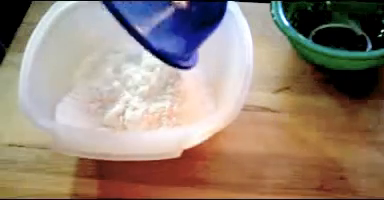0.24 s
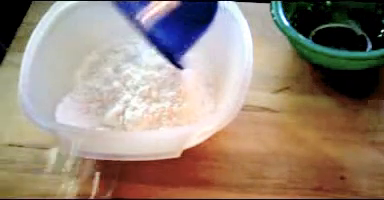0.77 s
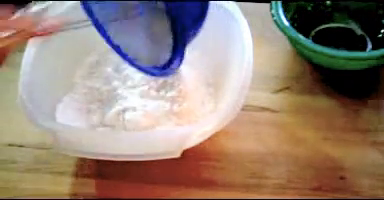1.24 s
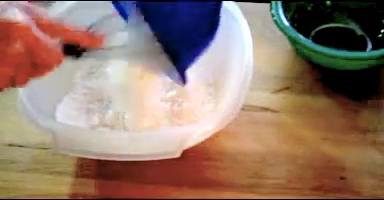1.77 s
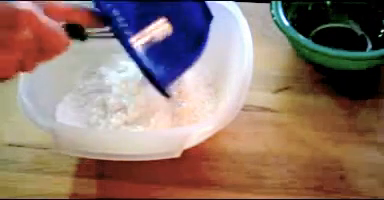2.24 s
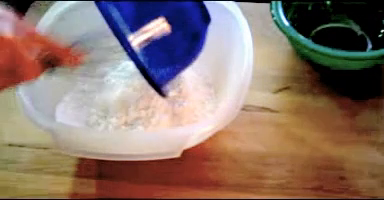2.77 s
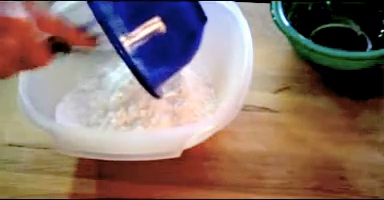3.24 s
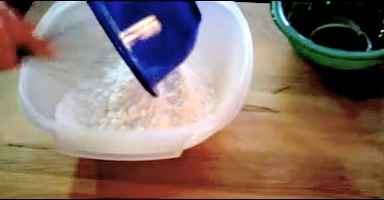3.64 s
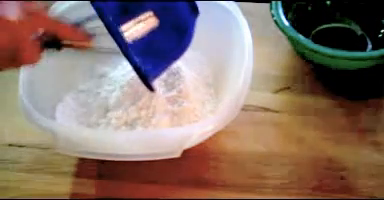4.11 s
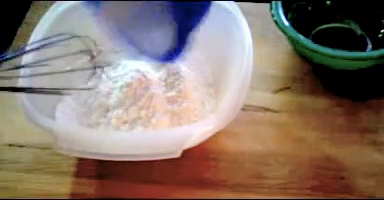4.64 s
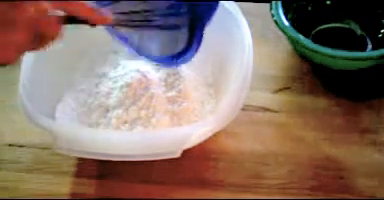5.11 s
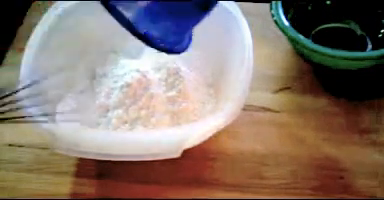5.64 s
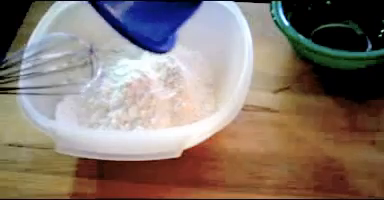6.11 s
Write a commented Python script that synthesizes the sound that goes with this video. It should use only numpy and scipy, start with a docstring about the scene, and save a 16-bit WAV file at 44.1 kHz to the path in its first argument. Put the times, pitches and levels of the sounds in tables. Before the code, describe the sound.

A dull low ring dies away in the first second over quiet kitchen rumble, microphone hiss and a thin, steady high whine. At about 1.3 seconds a wire whisk gives a bright, rattling clink close by. From 1.5 to 2.3 seconds plastic bowls bump softly while a faint hum swells and fades. From about 1.8 seconds the whisk is shaken roughly three times a second, scraping flour from a small plastic bowl into a large one. The strokes are faint at first, then become clearer ringing clinks against the rim between 3.3 and 4 seconds, stopping with soft bumps at 4.2. After a pause, another soft bump and a small scraping clink come at around 5.2 to 5.4 seconds. At 5.7 seconds one firm, hollow knock on the small bowl is the loudest sound. The room adds only a slight, short echo.

```python
"""A dull low ring dies away over quiet kitchen rumble, microphone hiss and a camera's thin whine.
Close by, a wire whisk scrapes flour from a small plastic bowl into a large one. The plastic gives soft
bumps while a faint hum swells and fades. The whisk is shaken about three times a second, and its wire
loops clink, scrape and ring as they meet the rim. Near the end comes one firm knock on the small bowl."""
import sys
import numpy as np
from scipy import signal
from scipy.fft import rfft, irfft
from scipy.io import wavfile
from scipy.ndimage import uniform_filter1d

SR = 44100
rng = np.random.default_rng(int(sys.argv[2]) if len(sys.argv) > 2 else 0)


def materialize(psi):
    """Save the field psi as 16-bit PCM at rate SR to the path in sys.argv[1].

    A 1-D psi becomes a single channel; in a 2-D psi each row is a channel.
    """
    bounded = np.clip(np.atleast_2d(psi).T, -1, 1)
    quanta = np.round(bounded * 32767).astype(np.int16)
    wavfile.write(sys.argv[1], SR, quanta)


N = 281358
TIME = np.arange(N) / SR
AGE = np.arange(int(.35 * SR)) / SR  # seconds since a hit began

# room rumble running into microphone hiss: (frequency [Hz], level [dB per Hz])
RUMBLE_AND_HISS = [(18, -66.5), (45, -74.5), (100, -82.5), (230, -89.5), (500, -93), (1000, -99),
                   (3500, -105.5), (5400, -107.7), (6100, -105), (6900, -109.7), (8200, -105),
                   (11200, -105.5), (13300, -109.5), (15300, -110)]
# the opening low ring; a fade time, or t60, is how long a sound takes to drop by 60 dB:
# (pitch [Hz], width [Hz], starting level [dB], fade time [s])
LOW_RING_BANDS = [(327, 24, -63.5, 1.8), (388, 59, -57, 0.54), (491, 29, -60.5, .4)]
# the tones each bowl rings with: (pitch [Hz], relative level [dB], fade time [s])
LARGE_BOWL_TONES = [(278, 2, 0.08), (406, 4, 0.026), (638, -4.5, 0.16), (745, 0, 0.14), (961, -0.5, 0.12),
                    (1106, 5, 0.03), (1288, -8.5, 0.082)]
SMALL_BOWL_TONES = [(122, -10, .12), (195, -12, .09), (320, -12, .06), (372, -3.5, .1), (430, -7, .08),
                    (738, -19, .08), (955, -8, .07), (1048, 0, .09), (1125, -4, .05), (1324, -14, .09),
                    (1548, -14, .1), (1775, -14, .1), (1901, -6, .09), (2028, 0, .085), (2265, -7, .08),
                    (2390, -4, .045), (2600, -7, .025), (3430, -18, .05), (4040, -14, .04),
                    (4420, -13, .04), (5100, -17, .04)]
# soft bumps of plastic on plastic: (time [s], ring level [dB], scuff level [dB])
SOFT_BUMPS = [(0.225, -58.5, -79), (1.469, -60, -58.5), (1.711, -62, -68), (1.951, -50.5, -56.5),
              (2.304, -45.5, -54.5), (4.1445, -55.5, -72), (4.19, -57, -62), (5.186, -51.5, -62.5)]
# a firm knock and its rebound: (time [s], ring level [dB], crack level [dB], clatter level [dB])
KNOCK_HITS = [(5.7245, -29.5, -46, -47), (5.7336, -51, -51, -55)]
# the tones of the wire loops: (pitch [Hz], relative level [dB], fade time [s])
WIRE_TONES = [(1088, 0, .17), (1850, -19, .08), (2690, -6, .05), (2772, -1, .22), (2860, -11, .07),
              (3380, -16, .08), (3750, -17, .045), (4660, -14, .08), (5080, -1, .135), (5243, -7, .08),
              (5600, -16, .07), (7450, -9, .06), (7700, -2, .14), (8255, -8, .08), (8905, -11, .09),
              (9180, -9, .1), (9440, -10, .1), (9880, -10, .07), (10340, -9, .06), (10680, -5, .14),
              (11130, -12, .07), (12790, -6, .08), (13730, -13, .05), (14970, -12, .045)]
# the pitches at which the next table boosts or cuts the wire tones: (pitch [Hz])
SPOT_PITCHES = (1080, 2770, 3750, 5100, 7700, 10600, 12800)
# where a loop is touched decides which tones ring:
# spot name -> (boost at each of the seven SPOT_PITCHES [dB], relative rasp level [dB])
TOUCH_SPOTS = {"tip": (-1.5, 1, -4.5, 1, -0.5, -1.5, 3, -5),
               "flank": (-17.5, -9, 4, -.5, -17, -6, -16, -10),
               "shoulder": (-13, 2, -9, -18, -4, -15, -15, -10), "edge": (-17, -20, -4, -3, -10, 2, 0, -7)}
# single clinks, rattles and slides of the wires: (time [s], level [dB], scrape time [ms], spot [name])
SINGLE_CLINKS = [(0.681, -62.5, 14, "tip"), (1.3263, -34.5, 1.3, "tip"), (1.3311, -40.5, 1.1, "tip"),
                 (1.339, -42, 0.73, "edge"), (1.3634, -51.5, 1, "tip"), (3.923, -42, 0.49, "flank"),
                 (5.3128, -50.5, 4.2, "shoulder"), (5.383, -71, 9, "edge"), (5.428, -67, 3.7, "edge")]
# shaking strokes that meet the rim: (time [s], level [dB], spot [name])
WHISK_STROKES = [(1.791, -69, "edge"), (2.090, -61.5, "flank"), (2.372, -65, "edge"), (2.705, -60, "flank"),
                 (3.02, -70.5, "tip"), (3.3053, -52, "flank"), (3.6054, -41, "flank"),
                 (3.9104, -44, "flank"), (4.1945, -50, "edge")]

FIRM_DB = -42  # level of a firm stroke; other touches are gentler or harder than this


def undb(db):
    """Turn decibels into a number to multiply a sound by."""
    return 10 ** (np.asarray(db) / 20)


def fade(t, t60):
    """A smooth dying away, 60 dB down when t reaches t60."""
    return np.exp(-np.log(1000) * t / t60)


def add(track, start_s, x):
    """Mix x into the track at the given time."""
    i = int(start_s * SR)
    track[i:i + len(x)] += x[:N - i]


def level(x, db):
    """Scale a hit so that its loudest hundredth of a second has the given level."""
    power = uniform_filter1d(x ** 2, SR // 100, mode="constant")
    return x * undb(db) / np.sqrt(power.max())


def band(x, lo_hz, hi_hz):
    """Keep the sound between two frequencies, with gentle edges."""
    return signal.sosfilt(signal.butter(2, [lo_hz, hi_hz], "band", fs=SR, output="sos"), x)


def shaped_noise(spectrum):
    """Noise whose strength from bass to treble follows a table."""
    hz, db = np.transpose(spectrum)
    all_hz = np.maximum(np.fft.rfftfreq(N, 1 / SR), 1)
    gain = undb(np.interp(np.log(all_hz), np.log(hz), db))
    return irfft(rfft(rng.standard_normal(N)) * gain, N) * np.sqrt(SR / 2)


def drift(per_second):
    """A smooth random wander, mostly between -1 and 1."""
    step = int(SR / per_second)
    return uniform_filter1d(np.repeat(rng.standard_normal(N // step + 1), step), step)[:N]


def tone(hz, db):
    """A pure tone whose pitch and level can move."""
    return np.sqrt(2) * np.sin(2 * np.pi * np.cumsum(hz) / SR) * undb(db)


def echoes(x, db, t60, lo_hz, hi_hz, gap_s=None):
    """Many tiny reflections that blur into one fading tail."""
    tail = band(rng.standard_normal(len(AGE)), lo_hz, hi_hz) * fade(AGE, t60)
    if gap_s:
        tail *= AGE > gap_s
    return undb(db) * signal.fftconvolve(x, tail / np.linalg.norm(tail))[:N]


def kitchen(x, echo_db, t60):
    """The sound plus its weak, short echo from the worktop and walls."""
    return x + echoes(x, echo_db, t60, lo_hz=170, hi_hz=6400, gap_s=.006)


def stereo(x, lag_samples):
    """Two microphone openings side by side: sound reaches the left one a hair later."""
    delay = np.exp(-2j * np.pi * np.fft.rfftfreq(N) * lag_samples)
    return np.array([irfft(rfft(x) * delay, N), x])


def channel_noise():
    """A little extra rumble and hiss, different in each channel."""
    shaped = np.array([shaped_noise(RUMBLE_AND_HISS) for _ in range(2)])
    return undb(-19) * shaped + undb(-68.5) * rng.standard_normal((2, N))


def background():
    """Rumble and hiss, a hum that swells once, the camera's whine and a low ring that dies away."""
    rumble_and_hiss = shaped_noise(RUMBLE_AND_HISS) * undb(.16 * drift(4.1))
    peak_s, rise_db_per_s, fall_db_per_s = 2.27, 7, 12.5
    below_peak_db = np.maximum(rise_db_per_s * (peak_s - TIME), fall_db_per_s * (TIME - peak_s))
    hum = tone(hz=177.6 + 1.31 * drift(6.85), db=-64.5 - below_peak_db)
    whine = tone(hz=7865 + 2 * drift(30), db=-67 + .5 * drift(9.8))
    low_ring = np.zeros(N)
    for hz, width, db, t60 in LOW_RING_BANDS:
        noise = band(rng.standard_normal(N), hz - width / 2, hz + width / 2)
        low_ring += noise / noise.std() * undb(db) * fade(TIME, t60)
    return rumble_and_hiss + hum + whine + low_ring


def crackle(t60, lo_hz, hi_hz, uneven_db=2.5):
    """A short burst of tiny contacts of uneven size."""
    noise, size = rng.standard_normal((2, len(AGE)))
    return band(noise * undb(uneven_db * size), lo_hz, hi_hz) * fade(AGE, t60)


def bowl_ring(tones, grip, grip_t60):
    """Struck plastic rings; the hand and the flour soak up most of the swing at once."""
    ring = np.zeros(len(AGE))
    for hz, db, t60 in tones:
        wave = np.sin(2 * np.pi * (hz * AGE + rng.random()))
        onset = 1 - np.exp(-2 * hz * AGE)
        ring += undb(db) * wave * onset * fade(AGE, t60)
    return ring * (1 + grip * fade(AGE, grip_t60))  # grip: the extra early swing that is soon lost


def bumps():
    """Soft blows ring only the low tones of the large bowl and scuff its floury wall."""
    out = np.zeros(N)
    for start_s, ring_db, scuff_db in SOFT_BUMPS:
        ring = level(bowl_ring(LARGE_BOWL_TONES, grip=2.6, grip_t60=.016), ring_db)
        scuff = level(crackle(t60=.091, lo_hz=2980, hi_hz=11000), scuff_db)
        thin_ring = level(crackle(t60=.16, lo_hz=5800, hi_hz=6100), ring_db - 21)
        add(out, start_s, ring + scuff + thin_ring)
    return out


def knock():
    """A hard blow on the emptied small bowl: a hollow ring, a crack and a clatter of the thin wall."""
    out = np.zeros(N)
    for start_s, ring_db, crack_db, clatter_db in KNOCK_HITS:
        ring = level(bowl_ring(SMALL_BOWL_TONES, grip=1.7, grip_t60=.085), ring_db)
        crack = level(crackle(t60=.041, lo_hz=2200, hi_hz=8400), crack_db)
        clatter = level(crackle(t60=.059, lo_hz=900, hi_hz=2560), clatter_db)
        add(out, start_s, ring + crack + clatter)
    return out


def wire_ring(hz, t60, loops=12):
    """One tone in all the loops: slightly out of tune, they start in step, soon cancel, then throb."""
    spread_hz = 27 + .0032 * hz
    detune = np.linspace(-1, 1, loops) + .187 * rng.standard_normal(loops)
    strength = np.exp(-1.5 * detune ** 2)
    phase = 2 * np.pi * (np.outer(hz + spread_hz * detune, AGE) + rng.random())
    first_swing = 1 + fade(AGE, t60=.13)  # the rim soon damps it
    return strength @ np.sin(phase) * fade(AGE, t60) * first_swing


def touch(db, scrape_ms, spot):
    """A wire slides on the rim: it rasps, the plastic thuds, the loops ring and a free one sings on."""
    *boosts_db, rasp_db = TOUCH_SPOTS[spot]
    harder_db = db - FIRM_DB
    swell = 1 - np.exp(-(AGE * 1000 / scrape_ms) ** 2)  # the sound builds while the wire slides
    damping = fade(AGE, t60=1.7 / scrape_ms)  # a wire that stays on the rim dies away sooner
    rasp = level(crackle(t60=.062, lo_hz=2480, hi_hz=12200) * swell, db + rasp_db)
    thud = level(crackle(t60=.12, lo_hz=332, hi_hz=1950) * swell, -56.5 + .37 * harder_db)
    free_loop_hz = 2772
    free_loop = np.sin(2 * np.pi * free_loop_hz * AGE) * fade(AGE, t60=.24)
    out = rasp + thud + level(free_loop * swell * damping, -61.5 + .4 * harder_db)
    for hz, tone_db, t60 in WIRE_TONES:
        ring = wire_ring(hz, t60) * swell * damping
        spot_db = np.interp(hz, SPOT_PITCHES, boosts_db)
        dull_db = .31 * scrape_ms * np.log2(hz / 3000)  # a longer slide favours the low tones
        out += level(ring, db + tone_db + spot_db - dull_db)
    return out


def whisk():
    """Shaking strokes tap the rim, the later ones brushing it on the way back; single clinks join in."""
    out = np.zeros(N)
    wide_from_s = 2.3  # earlier strokes are too narrow to touch on the way back
    for start_s, db, spot in WHISK_STROKES:
        gentler_db = FIRM_DB - db  # gentler strokes slide for longer and swing back later
        add(out, start_s, touch(db, scrape_ms=.66 * 2 ** (gentler_db / 9), spot=spot))
        if start_s > wide_from_s:
            back_s = start_s + .077 + .0008 * gentler_db
            add(out, back_s, touch(db=-58 - .32 * gentler_db, scrape_ms=4.3, spot="flank"))
    for start_s, db, scrape_ms, spot in SINGLE_CLINKS:
        add(out, start_s, touch(db, scrape_ms, spot))
    return out


def scene():
    """The whisk and bowls in the kitchen, over the quiet background."""
    clinks = whisk()
    wires = stereo(kitchen(clinks, echo_db=-21, t60=.28), lag_samples=.86)
    # the clinks bounce brightly off the bowl walls, with a separate echo for each ear
    bowl_echo = np.array([echoes(clinks, db=-19, t60=.3, lo_hz=4900, hi_hz=14000) for _ in range(2)])
    plastic = stereo(kitchen(bumps() + knock(), echo_db=-17, t60=.17), lag_samples=.84)
    return wires + bowl_echo + plastic + channel_noise() + stereo(background(), lag_samples=1)


def record(dry, top_hz=15250):
    """A steep filter cuts off the highest treble."""
    return signal.sosfilt(signal.ellip(10, .1, 80, top_hz, fs=SR, output="sos"), dry)


dry = scene()
out = record(dry)
materialize(out)
```